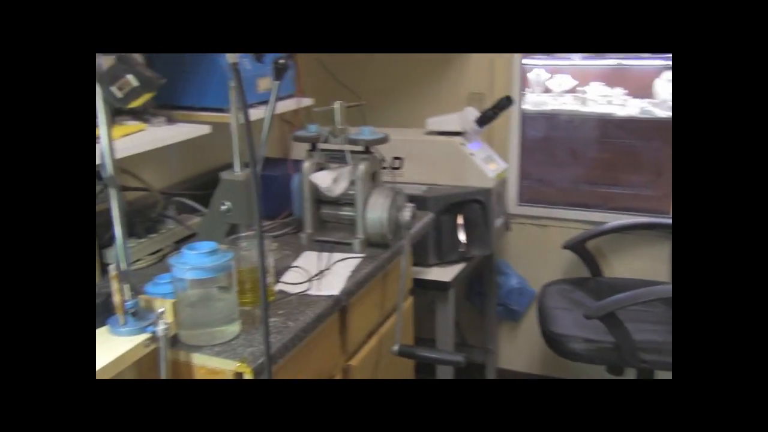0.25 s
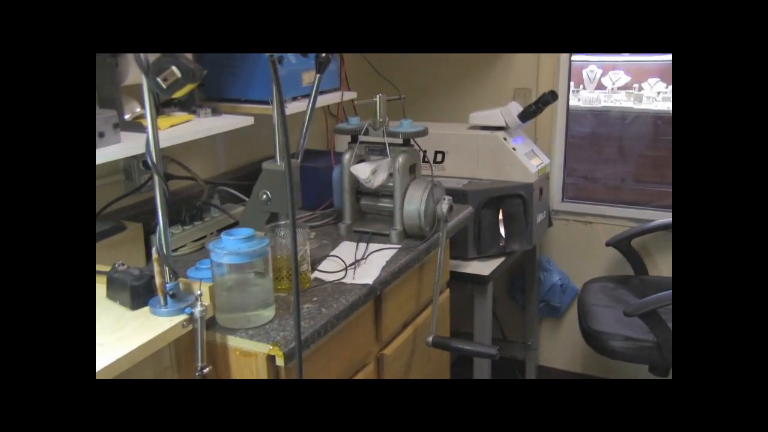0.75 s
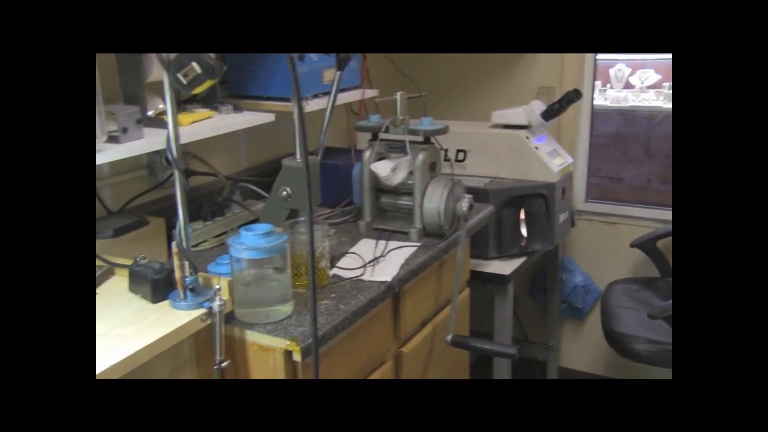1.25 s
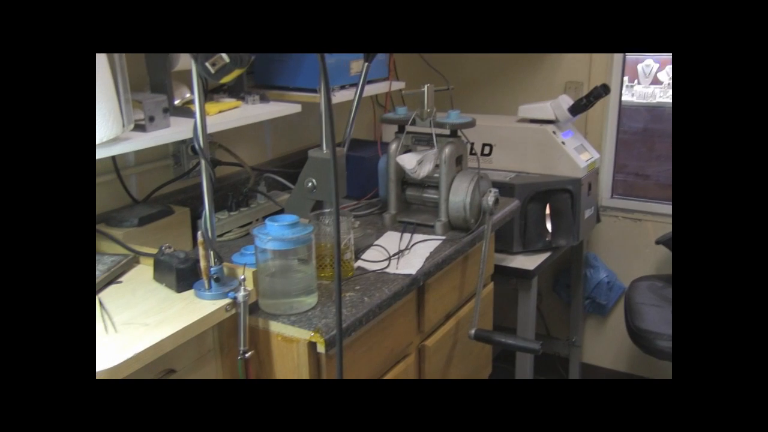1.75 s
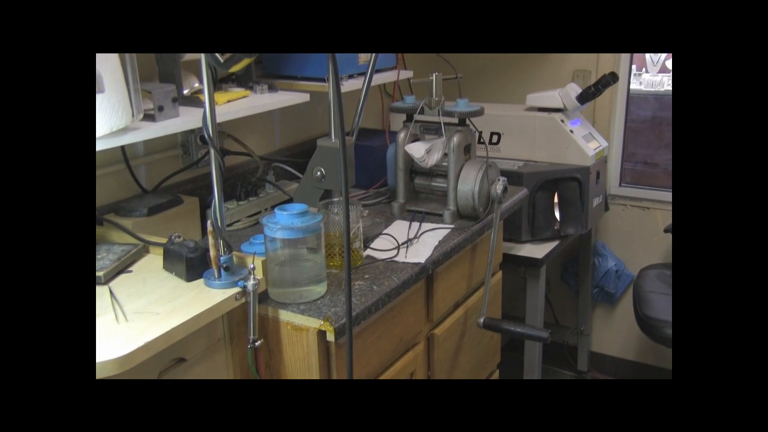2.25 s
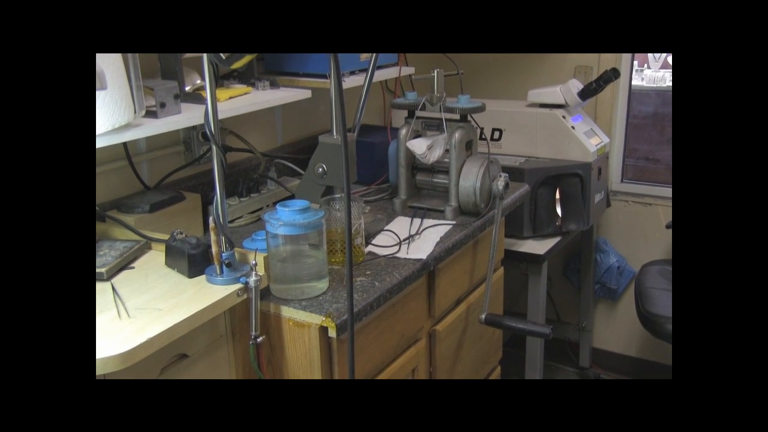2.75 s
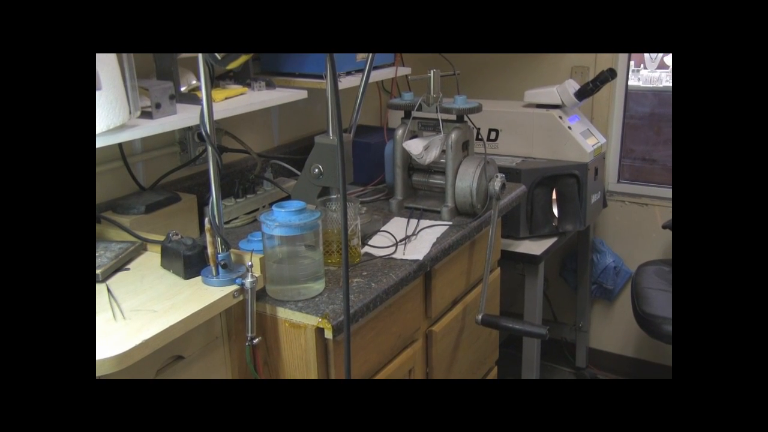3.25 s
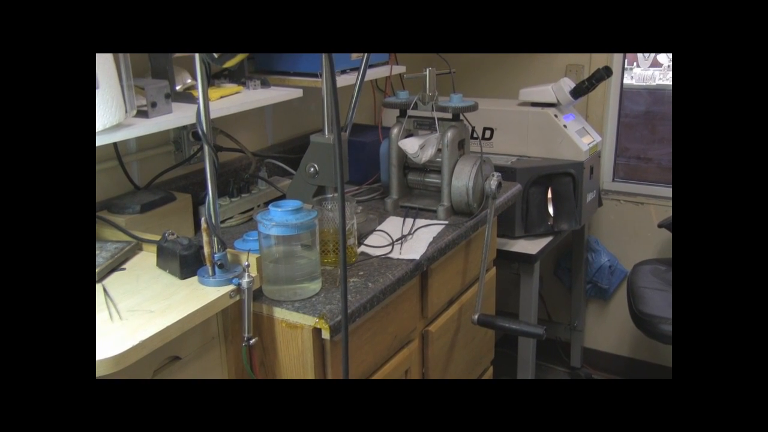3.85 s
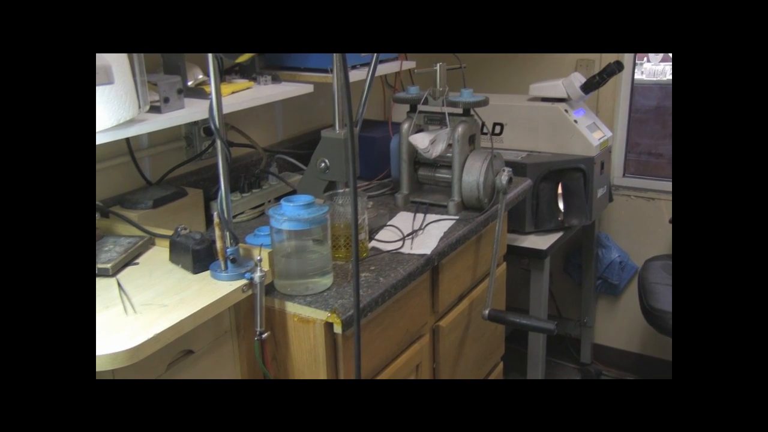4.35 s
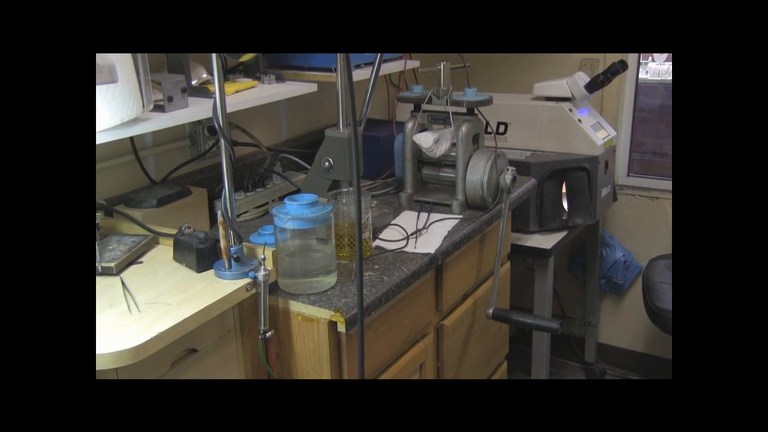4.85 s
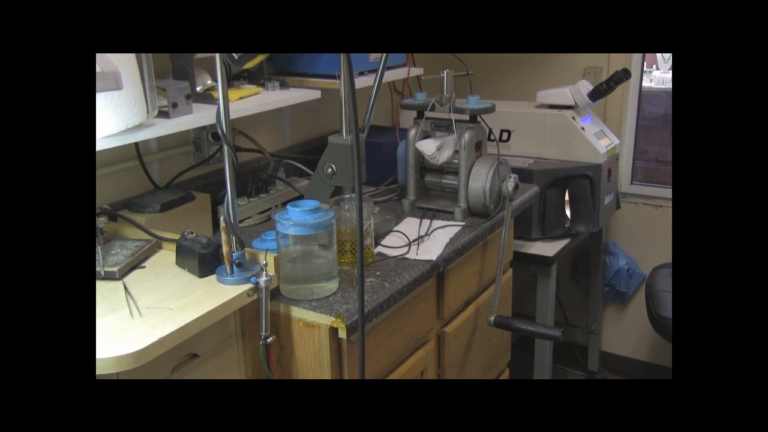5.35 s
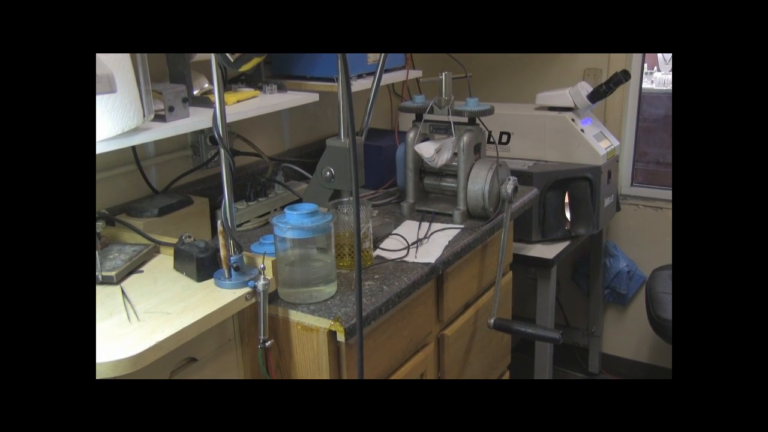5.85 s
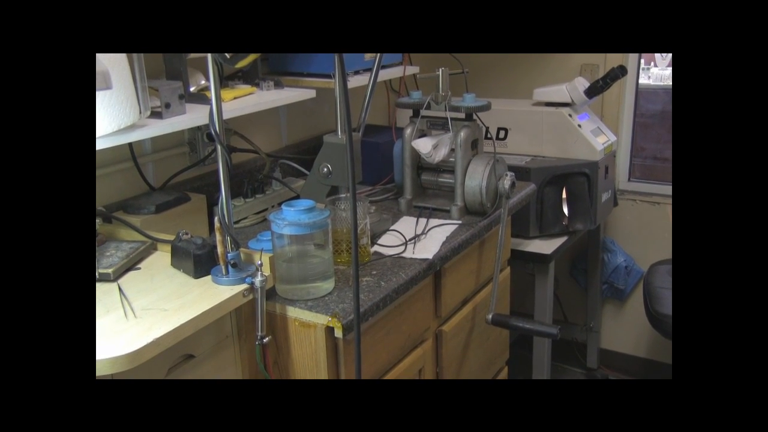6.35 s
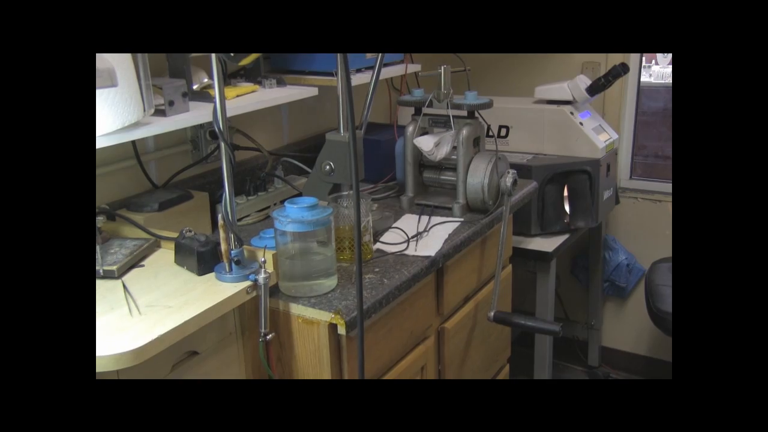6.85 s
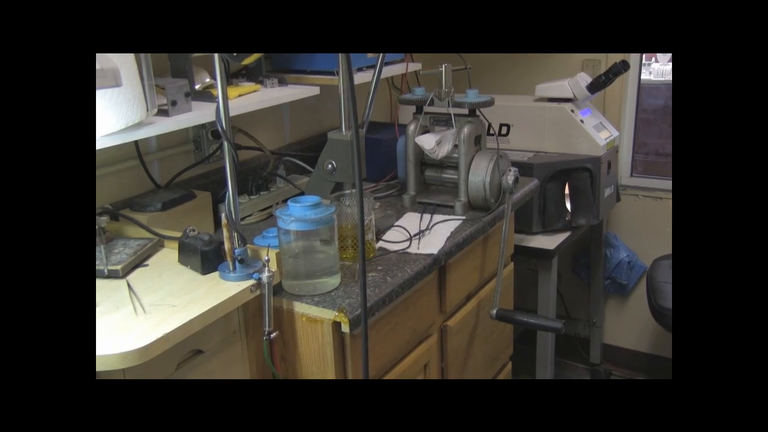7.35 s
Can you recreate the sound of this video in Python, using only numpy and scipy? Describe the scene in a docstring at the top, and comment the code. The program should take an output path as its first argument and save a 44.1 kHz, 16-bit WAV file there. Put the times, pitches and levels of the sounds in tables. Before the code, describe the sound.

A steam jet hisses and whistles against metal, stops with ticks and pedal clacks, then a long bright free blast dies away with a knock.

```python
"""Steam cleaner in a workshop

A first blast whistles and rumbles against the work; handling ticks and two clacks of the pedal valve
follow, then a long bright free jet that dies away with a knock, over room tone and a hum.
Hiss, whistles, rumble and knocks are noise shaped in short-time spectra; ticks and hum are sines.
Two close microphone ports hear it all, with likeness, phase and level that depend on frequency.
"""
import sys
import numpy as np
from scipy import signal
from scipy.io import wavfile
from scipy.ndimage import uniform_filter1d

SR = 44100
rng = np.random.default_rng(int(sys.argv[2]) if len(sys.argv) > 2 else 0)


def materialize(psi):
    """Save the field psi as 16-bit PCM at rate SR to the path in sys.argv[1].

    A 1-D psi becomes a single channel; in a 2-D psi each row is a channel.
    """
    bounded = np.clip(np.atleast_2d(psi).T, -1, 1)
    quanta = np.round(bounded * 32767).astype(np.int16)
    wavfile.write(sys.argv[1], SR, quanta)


N = 335160


def gain_of(db):
    """Logarithmic level: decibels to an amplitude factor."""
    return 10 ** (np.asarray(db) / 20)


def evened(x):
    """Normalization: scales to rms 1."""
    return x / np.sqrt(np.mean(x ** 2) + 1e-20)


def read(points, hz):
    """Spectral envelope: interpolates a table on a log-frequency axis."""
    f, value = np.transpose(points)
    return np.interp(np.log(hz + 1), np.log(f + 1), value)


def peak(hz, centre_hz, width_hz):
    """Resonance: the power curve of one damped mode, top 1."""
    return 1 / (1 + (2 * (hz - centre_hz) / width_hz) ** 2)


def unit(power):
    """Spectral density: scales each frame of a power spectrum to sum 1."""
    return power / power.sum(0)


def bump(t, s, length):
    """Gaussian envelope: a swell of top 1 around s, its length taken between the 1/e points."""
    return np.exp(-(2 * (t - s) / length) ** 2)


def grid(size, count):
    """Short-time analysis: bin frequencies (column) and frame times (row), hop a quarter frame."""
    hop = size // 4
    return np.fft.rfftfreq(size, 1 / SR)[:, None], np.arange(count // hop + 5) * hop / SR


def blotches(shape, bins, frames):
    """Random modulation: noise smoothed over bins and frames, rms 1."""
    field = rng.standard_normal(shape[::-1]).T
    smooth = uniform_filter1d(field, bins, 0)
    return evened(uniform_filter1d(smooth, frames, 1))


# Coherence of the ports. Each row: frequency in Hz, left-right likeness from 0 to 1.
PORT_LIKENESS = [(60, .88), (130, .88), (250, .72), (600, .62), (1200, .44), (2500, .36), (5000, .4),
                 (15000, .38)]
# Phase between the ports. Each row: frequency in Hz, lead of the left port in radians.
PORT_LEAD = [(60, -1.0), (400, -1.1), (950, -1.6), (1640, -2.9), (2500, -3.6), (5500, -5.7), (9000, -6.6),
             (15000, -6.0)]
# Level between the ports. Each row: frequency in Hz, left minus right in dB.
PORT_TILT = [(40, 9), (130, 5), (290, 2), (640, -2.3), (1410, -2), (3100, -1.2), (6820, -.8), (15000, -2)]


def heard(power, size, count):
    """Partial coherence: noise of the given power, alike at both ports only in part."""
    hz = grid(size, count)[0]
    a, b, c, d = rng.standard_normal(power.shape[::-1] + (4,)).T
    shared, separate = a + 1j * b, c + 1j * d
    same = np.clip(read(PORT_LIKENESS, hz), 0, 1)
    side = gain_of(read(PORT_TILT, hz) / 2)
    right = same * shared + np.sqrt(1 - same ** 2) * separate
    right = right * np.exp(-1j * read(PORT_LEAD, hz))
    spectra = np.sqrt(power) * np.array([shared * side, right / side])
    return signal.istft(spectra, nperseg=size, noverlap=3 * size // 4)[1][:, :count]


def room_ripple(shape):
    """Room colouration: the walls give a hiss a fine random ripple in dB that drifts slowly."""
    return 2.3 * blotches(shape, bins=1, frames=250)


# Levels set for the background. Each row: time in seconds, noise level in dB,
# level in dB given to the low tone, nearly silent around 4.85 s.
ROOM_LEVEL = [(0, -43, -51), (.4, -44, -56), (1.2, -31, -40), (1.685, -30, -38.5), (1.695, -38.5, -50),
              (2.4, -39, -52), (2.7, -41, -69), (4.55, -45, -75), (4.85, -46.5, -96), (5.15, -47, -72),
              (6, -46.5, -67), (6.5, -44, -68), (7.3, -46.5, -64), (7.6, -39.5, -53)]
# Colour of the shop noise. Each row: frequency in Hz, density in dB per Hz.
ROOM_COLOUR = [(44, -42), (75, -29), (86, -5.5), (115, -24), (143, -5), (373, -12), (408, -2.5),
               (487, -7.5), (545, -5.5), (796, -6.5), (1020, -14), (1140, -9.5), (1450, -14),
               (15400, -43.5)]
HUM_HZ = 58.3
# noise below BASS_HZ sinks by this share of the hum level's drop under BASS_FULL_DB
BASS_HZ, BASS_SHARE, BASS_FULL_DB = 105, 0.61, -47


def room_tone():
    """Noise of changing level and a modulated tone: dull shop noise over a wavering hum."""
    hz, t = grid(size=2048, count=N)
    s, noise_db, hum_db = np.transpose(ROOM_LEVEL)
    hum_drop_db = np.minimum(np.interp(t, s, hum_db) - BASS_FULL_DB, 0)
    bass_db = BASS_SHARE * hum_drop_db / (1 + (hz / BASS_HZ) ** 10)
    patches_db = 3.0 * blotches((len(hz), len(t)), bins=2, frames=12)
    colour = unit(gain_of(2 * read(ROOM_COLOUR, hz)))
    noise = heard(colour * gain_of(2 * (patches_db + bass_db)), size=2048, count=N)
    time = np.arange(N) / SR
    waver = np.interp(time, t, blotches((1, len(t)), bins=1, frames=8)[0])
    turn = 2 * np.pi * HUM_HZ * time + 0.62 * waver  # radians
    side = gain_of(read(PORT_TILT, HUM_HZ) / 2)
    ports = np.array([side * np.sin(turn), np.sin(turn - read(PORT_LEAD, HUM_HZ)) / side])
    hum = gain_of(0.91 * waver) * np.sqrt(2) * ports
    return noise * gain_of(np.interp(time, s, noise_db)) + hum * gain_of(np.interp(time, s, hum_db))


# Small metal ticks and the first thud of hard knocks.
# Each row: start in seconds, level in dB, middle frequency in Hz, t60 in seconds.
TICKS = [(0.289, -14.5, 5960, .03), (.315, -11.5, 7000, .03), (.355, -15, 6460, .03), (.6, -14, 6960, .03),
         (.81, -19, 6400, .03), (1.2532, -14.5, 6830, 0.018), (1.298, -24, 4300, 0.036),
         (1.299, -20, 7500, 0.025), (1.328, -26, 9150, 0.046), (1.345, -23.5, 3580, .04),
         (1.4, -38, 6100, .03), (1.495, -29, 4000, .04), (1.707, -13, 463, 0.026),
         (2.456, -15, 600, 0.0095), (7.3555, -7, 650, 0.0056)]


def ticks():
    """Modal decay: short rings of three close modes that beat as they die."""
    out, t = np.zeros(N + SR), np.arange(4000) / SR
    spreads = rng.uniform(-1.1, 1, (len(TICKS), 3))
    for (s, db, hz, t60), spread in zip(TICKS, spreads):
        modes = sum(np.sin(2 * np.pi * hz * (1 + 0.055 * k) * t) for k in spread) / 2
        ring = modes * np.minimum(t * hz, 1)  # swells over one cycle
        out[round(s * SR):][:len(t)] += gain_of(db - 60 * t / t60) * ring
    return np.array([0.57 * np.roll(out, 8)[:N], out[:N]])  # left is weaker and 8 samples late


# Clacks and knocks. Each row: start in seconds, level in dB, rise in seconds, t60 in seconds
# near 1.4 kHz, centre frequency in Hz, fall away from it in dB per octave.
KNOCKS = [(.46, -18.5, 0.009, 0.34, 1800, 4), (1.345, -29, 0.0046, 0.44, 2500, 5),
          (1.425, -18, .001, 0.3, 1200, 1), (1.49, -27, .006, 0.19, 4000, 10),
          (1.708, -17, 0.0017, 0.47, 2000, 1), (1.735, -22, .02, 0.39, 2000, 1),
          (1.765, -12.5, 0.019, 0.22, 1200, 2.5), (1.8, -21, 0.0069, 0.29, 3000, 3.5),
          (2.354, -17.5, 0.0028, 0.44, 800, 5), (2.359, -11.5, 0.0044, 0.39, 2500, -1),
          (2.446, -13.5, 0.01, 0.24, 500, 1.5), (2.49, -17.5, 0.0073, 0.14, 400, 18),
          (2.619, -21, 0.0087, 0.73, 350, -4), (6.056, -30.5, 0.0071, 0.15, 550, 8),
          (6.18, -27, 0.0075, 0.49, 900, 1), (6.284, -26, 0.018, 0.38, 350, 3.5),
          (6.372, -37, .01, 0.14, 250, 9), (7.303, -29.5, 0.016, 0.94, 1800, 0),
          (7.357, -22, 0.0018, 0.14, 910, 14), (7.45, -30.5, 0.011, 0.31, 1200, 1.5),
          (7.549, -32.5, .03, 0.41, 1000, 1.5)]
# What the knocks ring with. Each row: frequency in Hz, density in dB per Hz.
BODY_COLOUR = [(120, -16), (250, -9.5), (700, -9), (1150, -11.5), (1600, -11.5), (2020, -7.5), (2440, -3.5),
               (2800, -13.5), (3300, -10), (6300, -19), (8500, -22.5), (15900, -37)]
# Resonances of that body. Each row: frequency in Hz, width in Hz, height over the body in dB.
BODY_MODES = [(483, 100, 3), (720, 90, 2.5), (1360, 83, 8), (1610, 80, 7), (1980, 83, 7.5),
              (2370, 66, -1.5), (3050, 90, 2.5), (4850, 100, 2.5)]


def knocks():
    """Impact excitation: each blow sets the body ringing and rattling; the treble dies first in the room."""
    out, count = np.zeros((2, N + SR)), SR // 3
    hz, frame_t = grid(size=512, count=count)
    t = np.arange(count) / SR
    rings = 1 + sum((gain_of(2 * db) - 1) * peak(hz, f, w) for f, w, db in BODY_MODES)
    for s, db, rise, t60, centre_hz, fall_db in KNOCKS:
        octaves_away = abs(np.log2((hz + 1) / centre_hz))
        colour = unit(rings * gain_of(2 * (read(BODY_COLOUR, hz) - fall_db * octaves_away)))
        dying_db = -60 * frame_t / t60 * (hz / 1500 + 0.07) ** 0.22
        rattle_db = 1.5 * blotches((len(hz), len(frame_t)), bins=10, frames=2)
        sound = heard(colour * gain_of(2 * (dying_db + rattle_db)), size=512, count=count)
        attack = np.minimum(t / max(rise, 1e-4), 1)
        out[:, round(s * SR):][:, :count] += gain_of(db) * attack * sound
    bass_cut = signal.butter(2, 130, "high", fs=SR, output="sos")
    return signal.sosfilt(bass_cut, out[:, :N])


BOOM_HZ, BOOM_WIDTH_HZ = 145, 28.6  # width before the curve is cubed
# Boxy rumble against the work. Each row: frequency in Hz, width in Hz, level in dB.
RUMBLE = [(233, 46, 0.5), (421, 33, 4.5), (555, 49, -4), (610, 28, -6), (780, 50, -2)]
# Smooth roar in free air. Each row: frequency in Hz, density in dB per Hz.
JET_ROAR = [(110, -42), (190, 2.5), (347, 18), (380, 12.5), (599, 5), (930, -12), (1200, 8), (1560, -46),
            (2640, -120)]
# Low sound under each flow. Each pair: boom, then rumble, in dB relative to the hiss.
BLAST_LOW_DB = (-13.5, -9.5)
JET_LOW_DB = (-43, -36.5)
LOW_LINGER = 0.52  # the low sound follows only this share of the first blast's fall
LOW_FLUTTER_DB = 2
# Low surges of the flow and the hose.
# Each row: time of the crest in seconds, boom level in dB, rumble level in dB, t60 in seconds.
SURGES = [(.07, -50, -26.5, 0.36), (2.455, -26.5, -28, .4), (2.63, -38, -29, 0.96), (2.73, -32, -34, 0.8),
          (3.04, -46, -52, 0.51), (6.2, -48, -48, .4), (6.29, -41, -40, 0.67), (6.38, -37, -50, 0.33),
          (6.98, -48, -51, 0.52), (7.36, -53, -41, 0.43)]


def low_flow():
    """Flow-driven resonance: a low boom and a rumble, boxy against the work, smooth in free air."""
    hz, t = grid(size=4096, count=N)
    boom = unit(peak(hz, BOOM_HZ, BOOM_WIDTH_HZ) ** 3)
    boxy = unit(sum(gain_of(2 * db) * peak(hz, f, w) for f, w, db in RUMBLE))
    roar = unit(gain_of(2 * read(JET_ROAR, hz)))
    rumble = np.where(t < JET[0][0] - .2, boxy, roar)
    top_db = max(db for s, db in BLAST)
    blast_db = top_db + LOW_LINGER * (np.interp(t, *np.transpose(BLAST), right=-199) - top_db)
    jet_db = np.interp(t, *np.transpose(JET), left=-199)
    power = 0
    for k, shape in enumerate((boom, rumble)):
        steady = gain_of(2 * (blast_db + BLAST_LOW_DB[k])) + gain_of(2 * (jet_db + JET_LOW_DB[k]))
        level = steady * gain_of(2 * LOW_FLUTTER_DB * blotches((1, len(t)), bins=1, frames=3))
        for s, *db, t60 in SURGES:
            onset = np.clip(1 + (t - s) / 0.021, 0, 1) ** 2  # rises in the 21 ms before the crest
            level = level + gain_of(2 * (db[k] - 60 * np.maximum(t - s, 0) / t60)) * onset
        power = power + shape * level
    return heard(power, size=4096, count=N)


# Course of the first blast. Each row: time in seconds, hiss level in dB.
BLAST = [(0, -25), (.17, -23), (.76, -21.5), (1.16, -24), (1.27, -35), (1.44, -39), (1.58, -56), (1.7, -47)]
# Colour of its hiss. Each row: frequency in Hz, density in dB per Hz.
BLAST_HISS = [(180, -41), (300, -21), (424, -11), (1320, -11.5), (1840, -11), (2200, -12.5), (2510, -10),
              (4700, -13), (5190, -10.5), (7970, -11), (15400, -23)]
# Whistling edges. Each row: start frequency in Hz, end frequency in Hz, width in Hz before sharpening.
WHISTLES = [(1840, 1870, 70), (2600, 2640, 300), (3400, 3420, 70), (5130, 5560, 380), (8050, 8020, 170),
            (10100, 10550, 230)]
# Their levels in the same order, before choking and flutter.
# Each row: dB over the hiss at the start of the drift, dB over the hiss at its end.
WHISTLE_DB = [(-13.5, -10), (-18, -20), (-18, -17), (-12.5, -8), (-12, -15), (-5, -38)]
DRIFT_START_S, DRIFT_END_S = .1, 1.1
LATE = 1.45  # exponent; above 1 the change of level comes late in the drift
WHISTLE_NEEDS_DB, CHOKE = -28, .8  # below this hiss level whistles lose CHOKE dB more for each dB
# Short squeals. Each row: centre time in seconds, length in seconds, level in dB, frequency in Hz,
# width in Hz before sharpening.
SQUEALS = [(0.503, 0.13, -31, 2600, 300), (1.063, 0.059, -24.5, 2700, 300), (1.115, 0.073, -23.5, 1860, 70),
           (1.145, .07, -29, 3390, 70), (1.15, .06, -29, 5450, 360), (1.45, .04, -30, 2640, 300)]


def blast():
    """Edge tones in an impinging jet: steam strikes the work with hiss, spits and fluttering whistles."""
    hz, t = grid(size=1024, count=N)
    hiss_db = np.interp(t, *np.transpose(BLAST), right=-99)
    power = gain_of(2 * hiss_db) * unit(gain_of(2 * read(BLAST_HISS, hz)))
    choke_db = CHOKE * np.minimum(hiss_db - WHISTLE_NEEDS_DB, 0)
    drift = np.interp(t, (DRIFT_START_S, DRIFT_END_S), [0, 1])
    for (start_db, end_db), (start_hz, end_hz, width_hz) in zip(WHISTLE_DB, WHISTLES):
        flutter_db = 1.2 * blotches((1, len(t)), bins=1, frames=5)
        over_hiss_db = start_db + (end_db - start_db) * drift ** LATE
        level = gain_of(2 * (hiss_db + over_hiss_db + choke_db + flutter_db))
        centre_hz = start_hz + (end_hz - start_hz) * drift
        power = power + level * unit(peak(hz, centre_hz, width_hz) ** 1.5)
    for s, length, db, centre_hz, width_hz in SQUEALS:
        squeal = unit(peak(hz, centre_hz, width_hz) ** 1.3)
        power = power + gain_of(2 * db) * bump(t, s, length) * squeal
    spits_db = 0.7 * blotches(power.shape, bins=60, frames=3)
    return heard(power * gain_of(2 * (spits_db + room_ripple(power.shape))), size=1024, count=N)


# Course of the free jet. Each row: time in seconds, level in dB.
JET = [(2.44, -21.5), (2.51, -15), (2.62, -17), (2.91, -16), (2.98, -17.5), (3.22, -15.5), (3.7, -16),
       (4.01, -17), (4.18, -15.5), (4.45, -18.5), (4.98, -15), (5.2, -17.5), (5.7, -15.5), (5.96, -17.5),
       (6.49, -16.5), (6.55, -19.5), (7.02, -20), (7.35, -31), (7.5, -46), (7.6, -48)]
# Colour of its hiss. Each row: frequency in Hz, density in dB per Hz.
JET_HISS = [(290, -61), (500, -19.5), (930, -17), (1300, -15), (1500, -9), (3300, -4.5), (3700, -4),
            (5500, -2.5), (6000, -1), (8000, -1), (12500, -2.5), (14300, -2), (15900, -6)]
# Faint rings of the nozzle. Each row: frequency in Hz, width in Hz, dB over the hiss before RING_DEPTH.
NOZZLE = [(1220, 25, 5), (6050, 110, 1.5), (6200, 40, 2.5), (6400, 50, 2), (8040, 30, 3), (8980, 40, 2),
          (9600, 40, 2)]
# Moments when each ring is clearest, in the same order. Each entry: time in seconds.
RING_PEAK_S = [4.93, 3.4, 4.5, 2.8, 4, 6, 5.3]
RING_SPAN_S, RING_DEPTH = 4.8, 2.26  # how long it stands out; factor on its dB at that moment
# wet steam thickens the jet's middle below 5 kHz, then dries off; one dry puff interrupts it
WET_DB_PER_OCTAVE, DRYING_S = 12, .35
DRY_PUFF_S, DRY_PUFF_LENGTH_S, DRY_PUFF_DB_PER_OCTAVE = 2.54, 0.13, -11
DULL_BELOW_DB = -20
DULLING = 0.27  # dB per octave gained for each dB the jet sinks below DULL_BELOW_DB


def jet():
    """Turbulent jet noise: broadband hiss swells and flickers while faint nozzle rings fade in and out."""
    hz, t = grid(size=1024, count=N)
    s, db = np.transpose(JET)
    level_db, age = np.interp(t, s, db), np.maximum(t - s[0], 0)
    slope = WET_DB_PER_OCTAVE * np.exp(-age / DRYING_S)
    slope = slope + DRY_PUFF_DB_PER_OCTAVE * bump(t, DRY_PUFF_S, DRY_PUFF_LENGTH_S)
    slope = slope + DULLING * np.maximum(DULL_BELOW_DB - level_db, 0)
    wet_db = slope * np.log2(5000 / np.clip(hz, 1000, 5000))  # levels off below 1 kHz
    rings = 1
    for clearest, (ring_hz, width_hz, ring_db) in zip(RING_PEAK_S, NOZZLE):
        height_db = ring_db * RING_DEPTH * bump(t, clearest, RING_SPAN_S)
        rings = rings + (gain_of(2 * height_db) - 1) * peak(hz, ring_hz, width_hz)
    power = gain_of(2 * level_db) * unit(rings * gain_of(2 * (read(JET_HISS, hz) + wet_db)))
    patches_db = 0.7 * blotches(power.shape, bins=20, frames=14) + room_ripple(power.shape)
    flicker_db = 0.55 * blotches((1, len(t)), bins=1, frames=8)
    opening = np.clip((np.arange(N) / SR - s[0]) / 0.0056, 0, 1)  # the valve snaps open
    return opening * heard(power * gain_of(2 * (patches_db + flicker_db)), size=1024, count=N)


def scene():
    """Superposition: all sources add at the two ports."""
    return room_tone() + ticks() + knocks() + low_flow() + blast() + jet()


def record(dry):
    """Band limitation: the recorder passes 24 Hz to 15.95 kHz."""
    dry = signal.sosfilt(signal.butter(2, 24, "high", fs=SR, output="sos"), dry)
    treble_cut = signal.firwin(511, 15950, window=("kaiser", 9), fs=SR)
    return signal.oaconvolve(dry, treble_cut[None], "same")


dry = scene()
out = record(dry)
materialize(out)
```